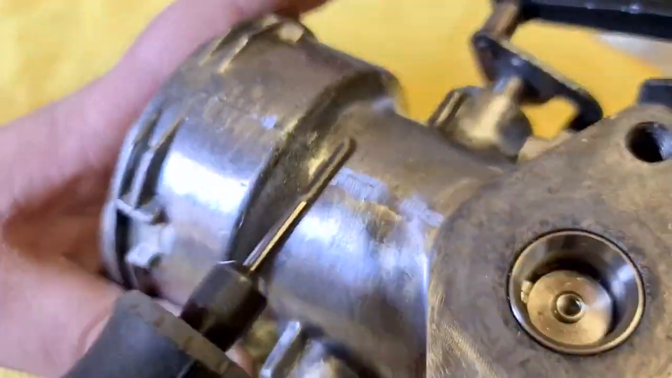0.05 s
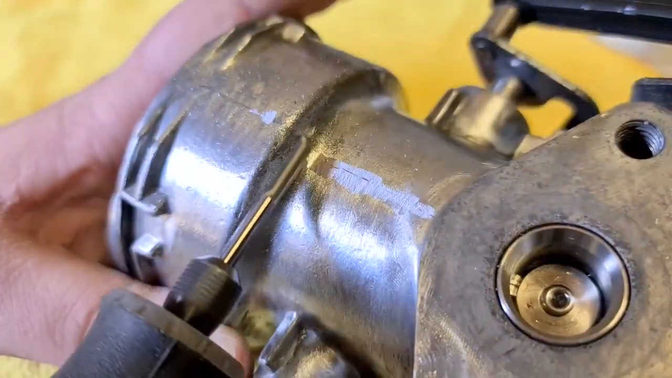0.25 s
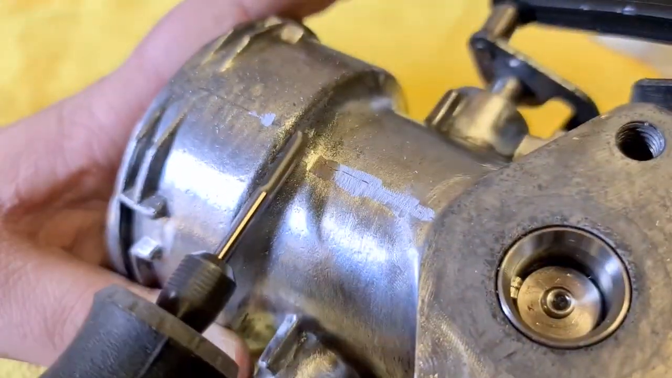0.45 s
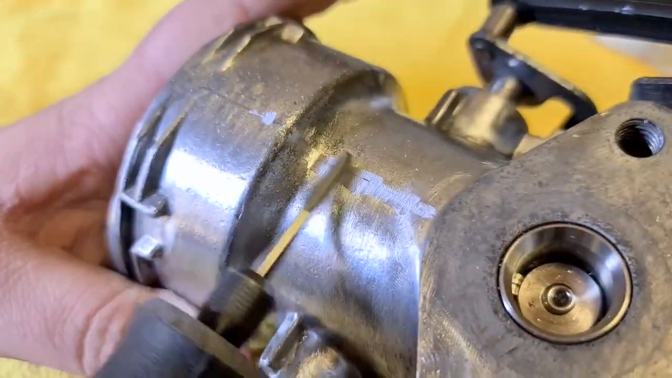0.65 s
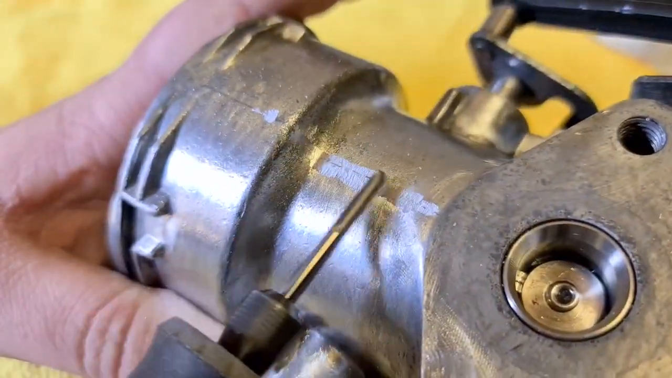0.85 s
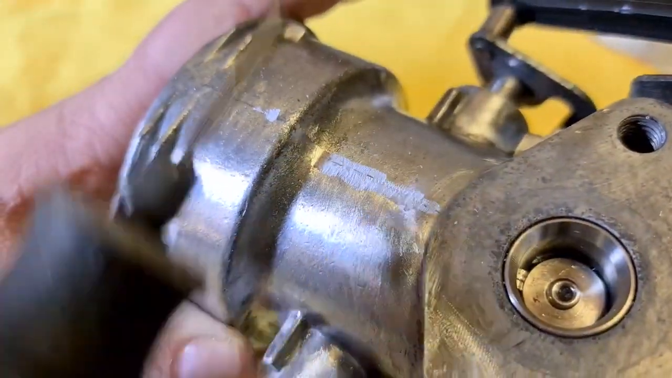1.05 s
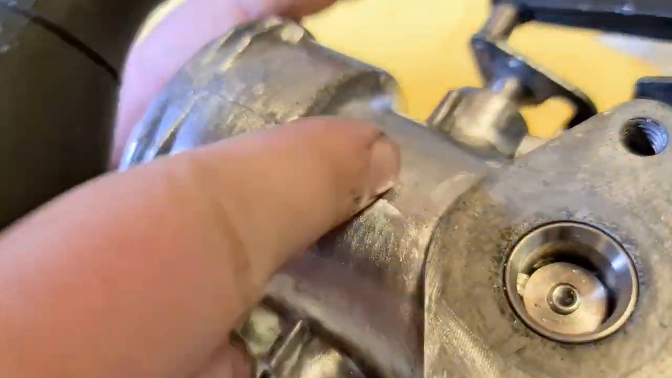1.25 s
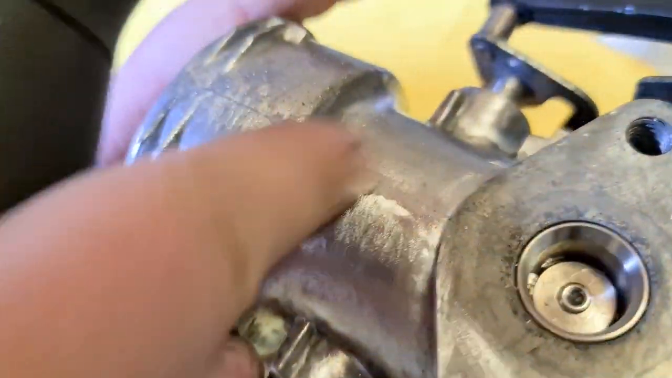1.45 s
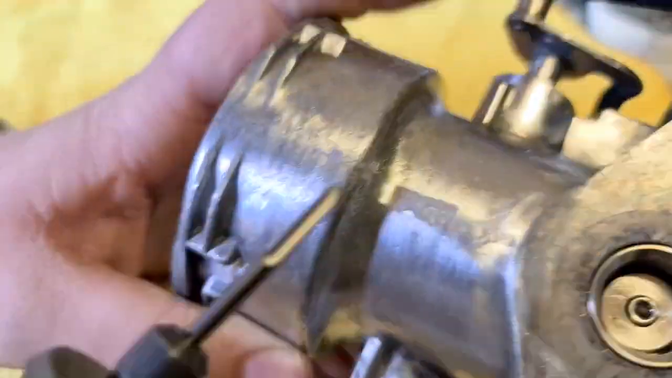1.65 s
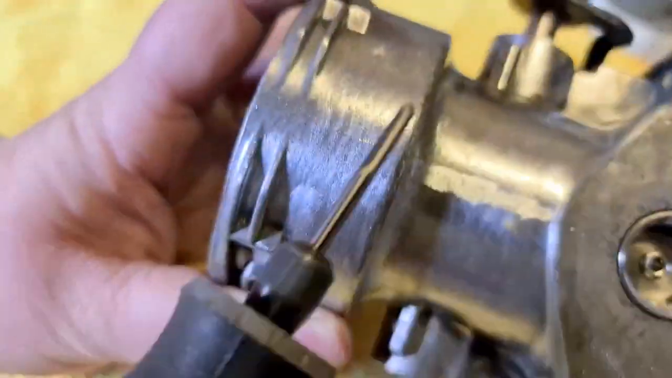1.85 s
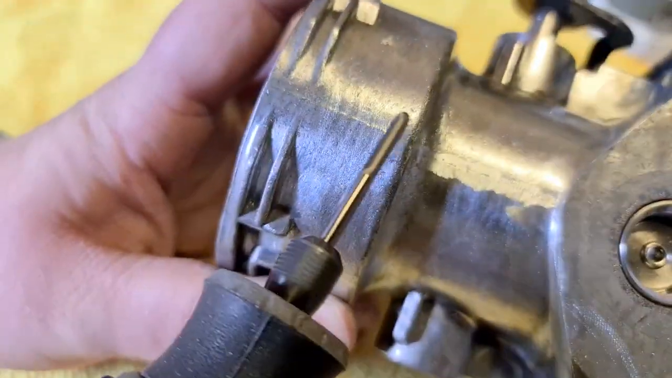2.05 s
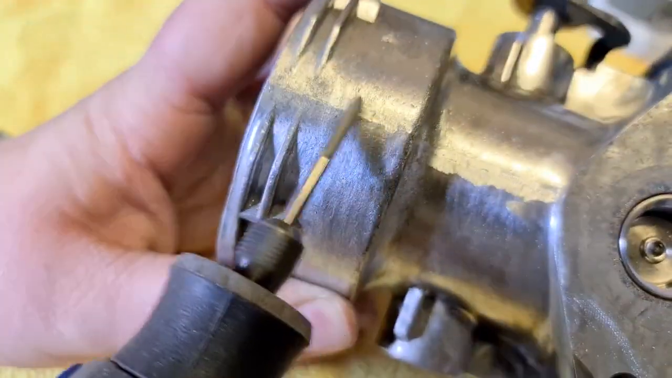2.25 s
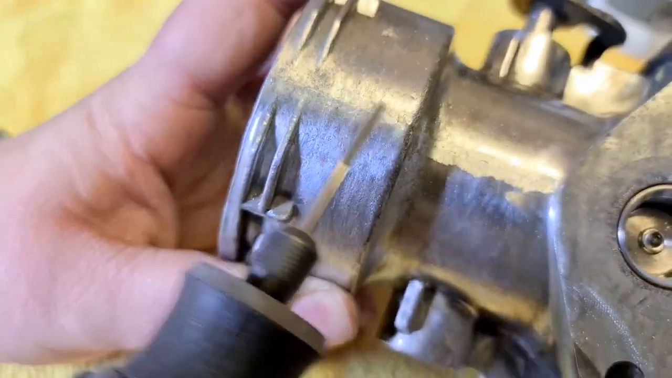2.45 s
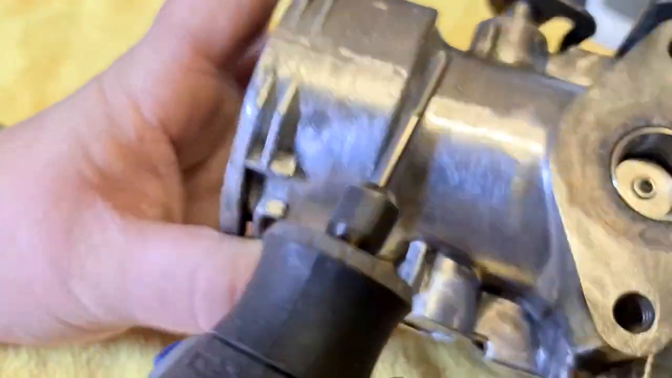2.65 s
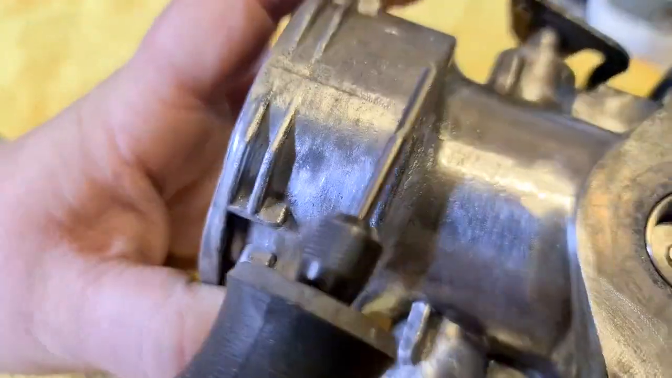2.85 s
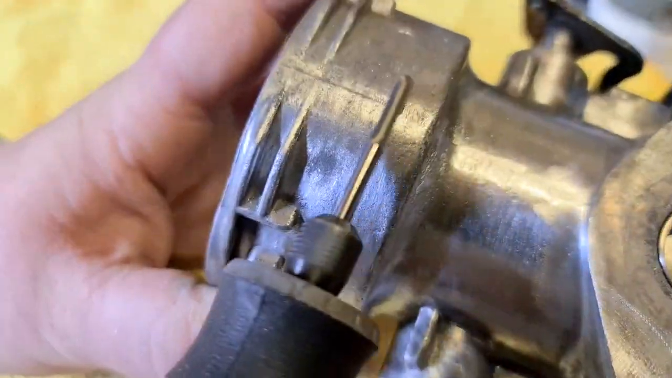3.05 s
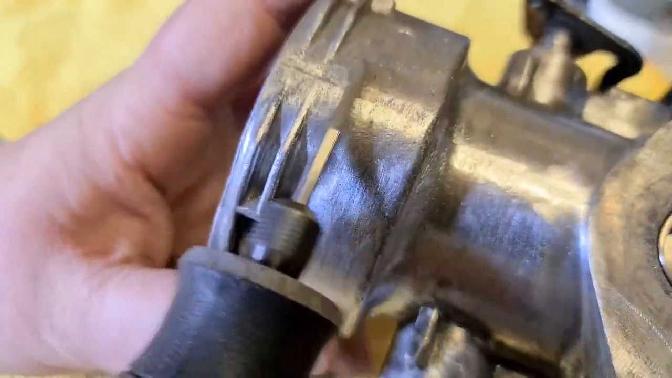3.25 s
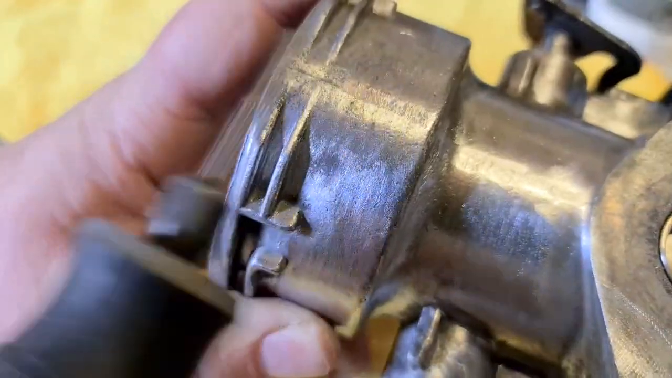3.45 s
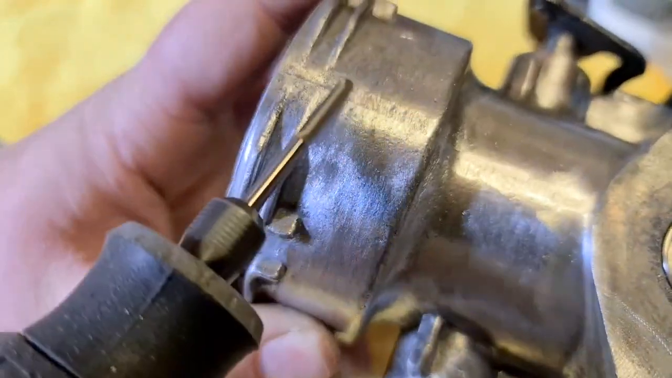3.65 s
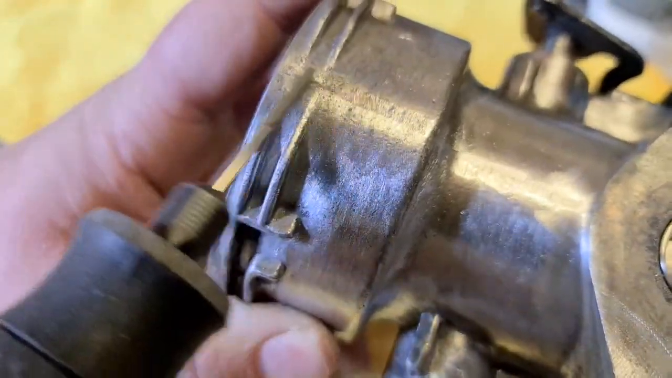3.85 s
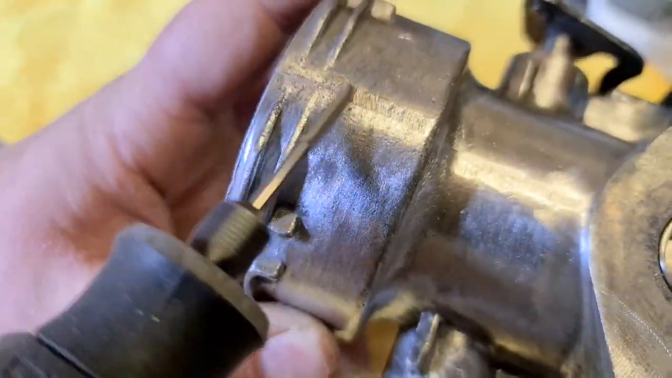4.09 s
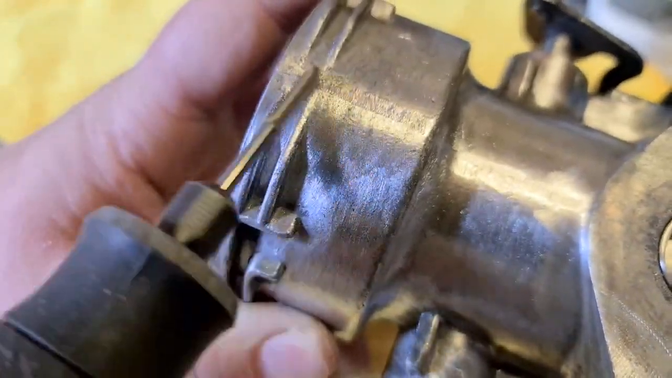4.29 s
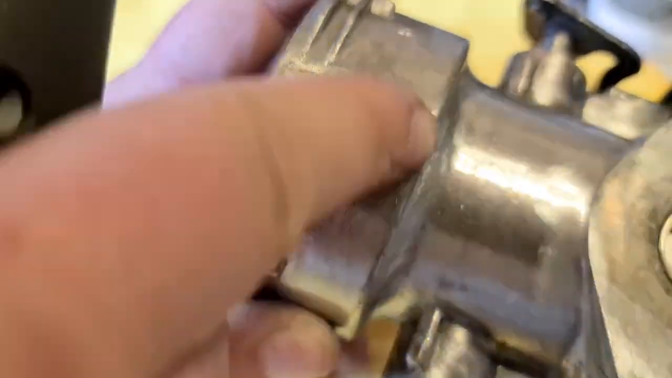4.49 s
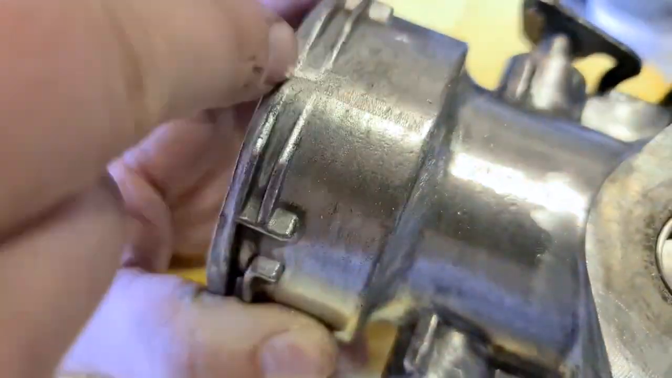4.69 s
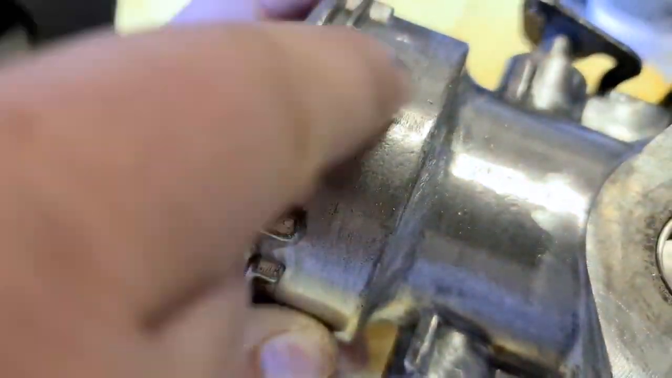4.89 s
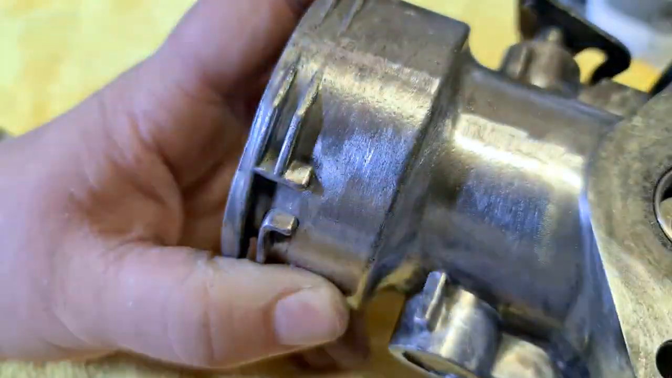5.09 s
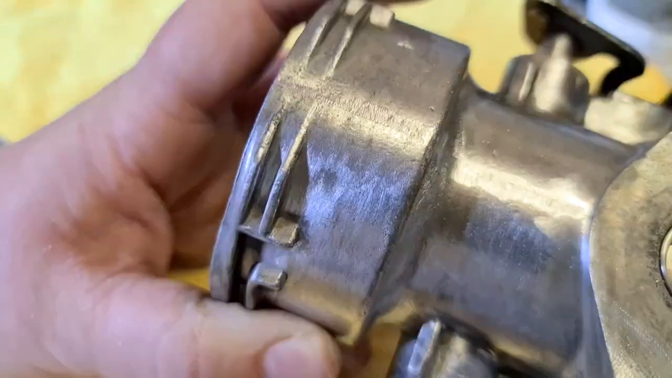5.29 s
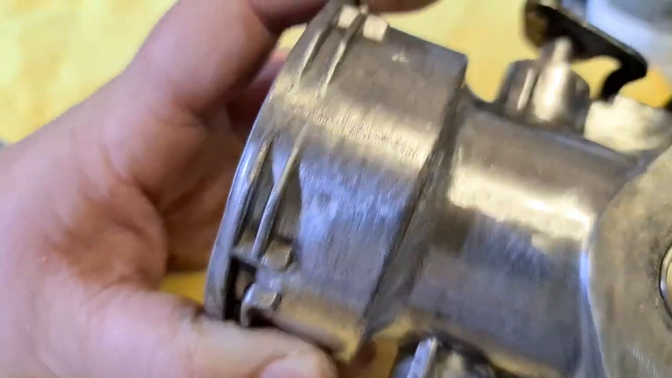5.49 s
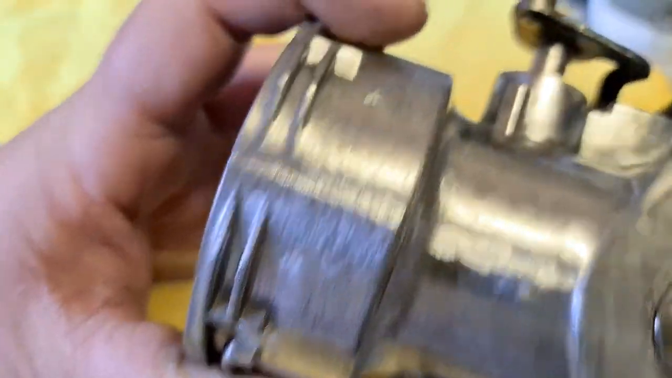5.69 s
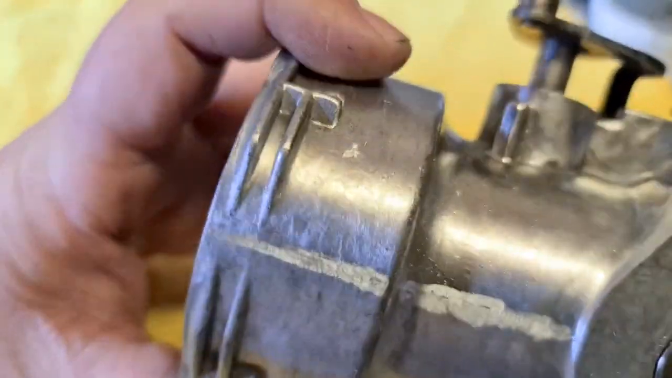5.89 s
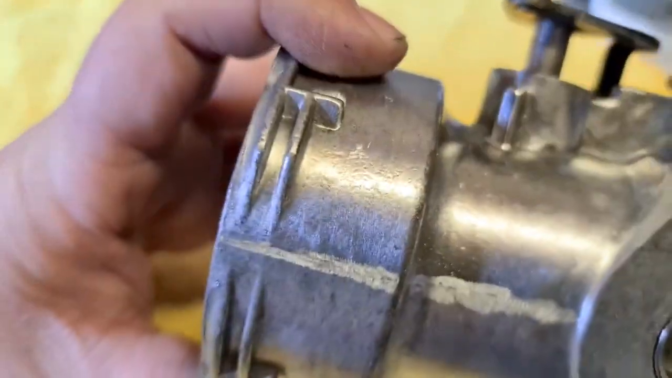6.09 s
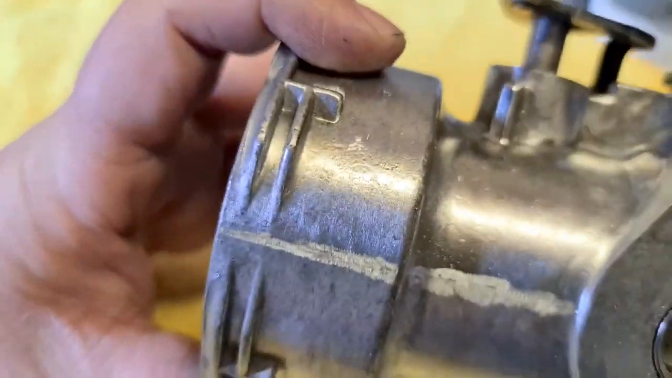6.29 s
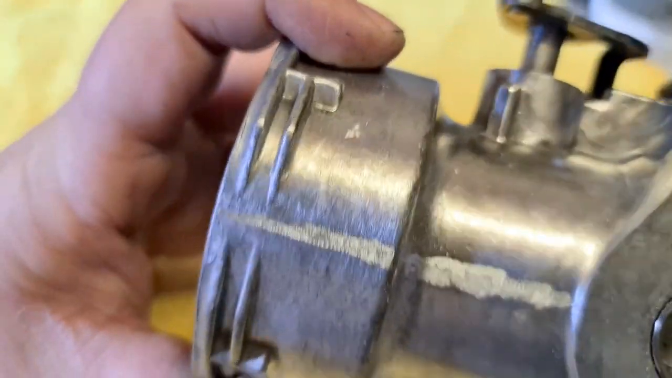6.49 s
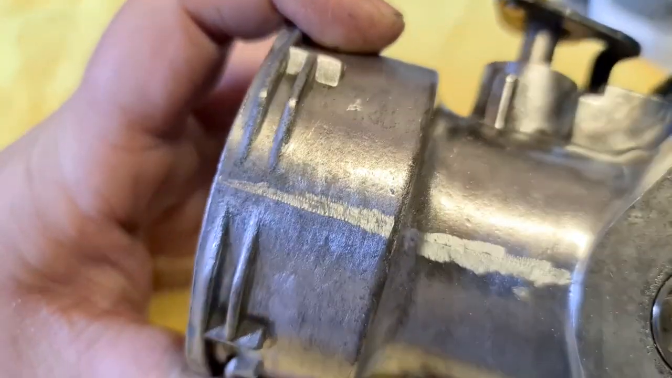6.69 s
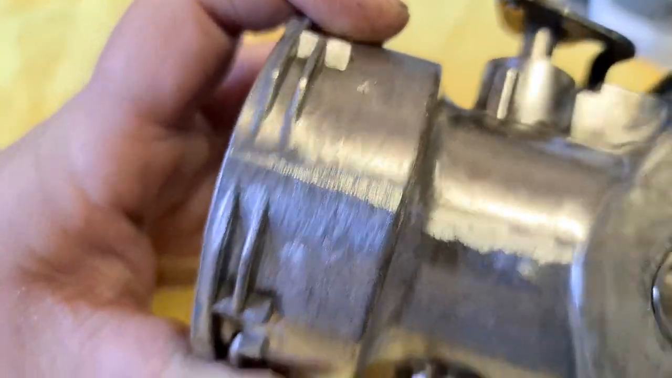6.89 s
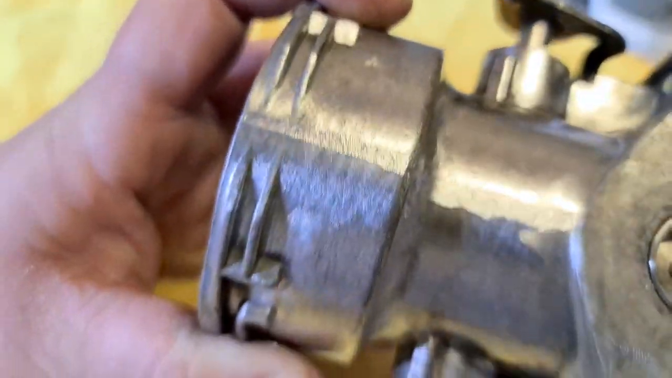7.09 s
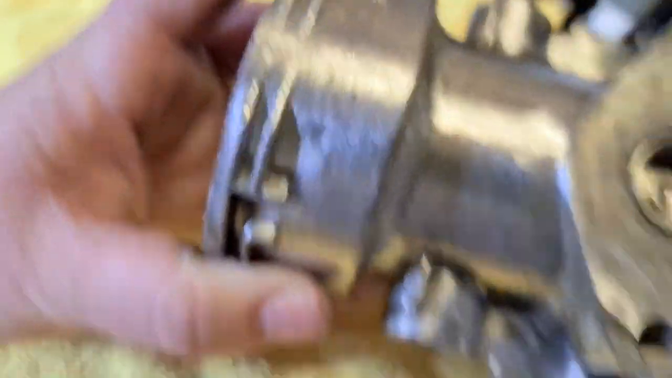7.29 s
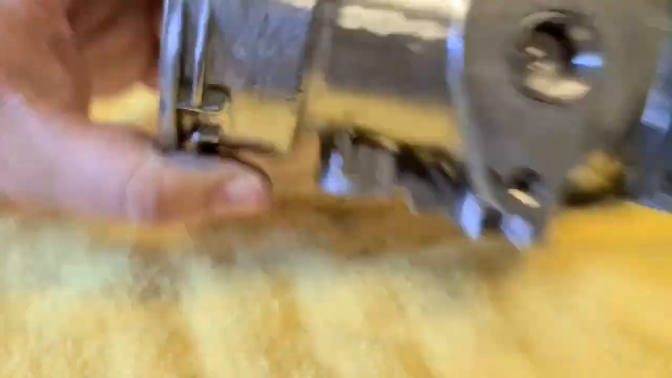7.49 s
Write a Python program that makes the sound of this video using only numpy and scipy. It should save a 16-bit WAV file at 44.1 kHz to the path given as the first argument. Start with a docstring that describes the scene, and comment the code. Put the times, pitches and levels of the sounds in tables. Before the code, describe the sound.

Close up in a small workshop, a handheld rotary tool runs at fast-forward pace, its whine and fan hiss unnaturally high. Its bit squeals on a metal casting in three clusters of tiny stuttering bites, with airy gaps between. The pitch leaps briefly, then time returns to normal and the motor coasts down, whine and rush gliding lower and fading into faint room hum and hiss.

```python
"""Rotary tool on an aluminium casting

A handheld tool smooths a casting close by, at six times its pace, so every tone lies high.
The bit's chatter and grit, the motor's tones and the fan's air follow one shaft speed.
That speed surges once; then time drops to its normal pace and the motor coasts down.
Its tones glide and its filtered noise fades with falling speed, over a low room hum."""
import sys
import numpy as np
from scipy import signal
from scipy.fft import rfft, irfft, next_fast_len
from scipy.io import wavfile

SR = 44100
rng = np.random.default_rng(int(sys.argv[2]) if len(sys.argv) > 2 else 0)


def unload_audio(sound):
    """Save the sound as a 16-bit wav file, at the path given as the first command line argument."""
    columns = np.transpose(np.atleast_2d(sound))
    # keep every value between -1 and 1, then stretch to whole-number steps
    steps = np.round(np.clip(columns, -1, 1) * 32767)
    wavfile.write(sys.argv[1], SR, steps.astype(np.int16))


N = 332514
T = np.arange(N) / SR
BINS = np.fft.rfftfreq(next_fast_len(N), 1 / SR)

NORMAL_PACE_S, FAST_FORWARD = 5.394, 6
RIPPLE_HZ, HUM_HZ = 100, 49.5   # at normal pace
CUTOFF_HZ = 15900
# the switch is pushed past a higher setting: the speed swells in one arc
SURGE_S, SURGE_RISE_S, SURGE_HZ = 5.296, .074, 1120

# Stereo of the working and the coasting tool at two microphone ports. Each holds three lists of rows:
# frequency in Hz, likeness of the ports (below 0 counts as 0); frequency in Hz, left over right in dB;
# frequency in Hz, lead of the left port in radians.
WORK_PORTS = ([(60, -0.08), (130, 0.25), (290, 0.64), (640, 0.34), (1410, 0.17), (3100, 0.19),
              (6820, -0.25), (15000, -0.18)], [(60, 0.0), (110, 2.5), (200, 7.0), (380, 1.5), (700, 5.5),
              (1290, 7.0), (2380, 0.5), (4400, 4.0), (8120, 5.0), (15000, 7.5)], [(0, 0), (780, -0.1),
              (1290, 1.4), (2670, 0.1), (4050, 1.1), (5510, 1.7), (6290, 3.0), (7060, 2.3), (8350, 3.4),
              (9650, 2.8), (10600, 3.6), (10900, 3.3), (15200, 4.6), (16700, 4.1)])
COAST_PORTS = ([(60, 0.99), (130, 0.91), (290, 0.76), (640, 0.15), (1410, -0.33), (3100, -0.13),
               (6820, 0.08), (15000, 0.06)], [(60, 0.0), (110, 0.0), (200, 2.0), (380, 1.5), (700, 0.0),
               (1290, 4.0), (2380, 2.5), (4400, 2.5), (8120, 3.0), (15000, 5.5)], [(0, 0), (1030, 1.8),
               (2070, 2.6), (3010, 4.1), (3450, 5.7), (4570, 6.4), (5430, 6.8), (7060, 15.9), (7580, 21.4),
               (9220, 24.8), (9730, 24.4), (10700, 18.2), (11400, 19.0), (16700, 25.5)])
# Fan hiss under power. Each row: time in seconds, relative level in dB.
HISS = [(0, -38.5), (.15, -44.5), (.5, -39.5), (.95, -44), (1.25, -40.5), (1.58, -40), (1.65, -42.5),
        (1.97, -41.5), (3.35, -39.5), (3.55, -41), (4.78, -42), (4.87, -45), (5.1, -40.5), (5.16, -49.5),
        (5.29, -47.5)]


def grinding(shaft):
    """The bit hits once a turn with uneven force; grit rings the same metal in between."""
    # Chatter heard as growl of the casting and as squeal. Each row: multiple of shaft speed, level in dB.
    growl_orders = [(2, -8.5), (3, -0.35), (4, -15.5), (5, -16)]
    squeal_orders = [(7, -18), (8, -13), (10, -16.5), (11, 3)]
    # Resonances of bit and casting. Each row: frequency in Hz, width in Hz, level in dB.
    grit_modes = [(2730, 76, -16), (4200, 120, -11), (4840, 270, -18), (10360, 1500, -19),
                  (10450, 300, -13), (13920, 620, -9), (15100, 190, 5)]
    # Each pass works another spot, which favours other orders of the growl.
    # Each row: start in seconds, end in seconds, gain of the second order in dB, of the fourth in dB.
    passes = [(.28, .705, 2.5, -2), (.705, 1.12, -1, 0), (2.16, 2.55, -2, -2), (3.0, 3.49, 1.5, 3),
              (3.79, 4.5, .5, -1)]
    # Bounces of the bit. Each row: start in seconds, end in seconds, relative level in dB.
    bounces = [(.833, 0.844, -34.5), (2.45, 2.461, -39)]
    attack_s, release_s = .001, .0028

    force_db = 1.4 * (drift(70) + np.array([drift(110), drift(110)]) / 2)
    squeal, growl = bites(attack_s, release_s) * from_db(force_db)
    hit = shaft + 0.065 * drift(58)   # the point of contact wanders round the bit
    second_db, fourth_db = sum(np.outer(gains_db, gate(T, start, end, attack_s, release_s))
                               for start, end, *gains_db in passes)
    spot_db = {2: second_db, 4: fourth_db}
    growl_tones = sum(from_db(db + spot_db.get(order, 0)) * wavering(order * hit, rough=0.26, rate=67)
                      for order, db in growl_orders)
    squeal_tones = sum(from_db(db) * wavering(order * hit, rough=0.2, rate=100)
                       for order, db in squeal_orders)
    bounce = sum(from_db(db) * gate(T, start, end, attack_s, release_s) for start, end, db in bounces)
    bounce_tone = bounce * wavering(3.5 * hit, rough=0.45, rate=85)
    tones = growl * growl_tones + squeal * squeal_tones + bounce_tone
    grit = rms_one(to_wave(noise(WORK_PORTS, resonances(grit_modes))))
    grit = grit * (1 + 0.11 * np.cos(hit))   # pulses once a turn
    return from_db(0.5) * to_wave(at_ports(WORK_PORTS, to_bins(tones))) + from_db(1.5) * squeal * grit


def bites(attack_s, release_s):
    """Squeal and growl strength: each touch sets in fast, swells and lets go, skimming on either side."""
    # The bit bites the metal. Each row: start in seconds, end in seconds,
    # relative level of the squeal in dB, of the casting's growl in dB.
    touches = [(0.309, 0.349, -34.0, -35.0), (0.351, 0.392, -32.5, -36.0), (0.393, 0.431, -32.5, -38.0),
               (0.432, 0.465, -39.0, -40.5), (0.481, 0.492, -36.5, -36.0), (0.489, 0.521, -41.0, -47.0),
               (0.524, 0.551, -35.0, -42.0), (0.555, 0.584, -39.5, -42.0), (0.581, 0.608, -41.0, -41.5),
               (0.606, 0.618, -37.0, -50.0), (0.617, 0.646, -39.5, -46.5), (0.66, 0.687, -35.5, -40.5),
               (0.682, 0.694, -33.5, -36.5), (0.718, 0.772, -35.0, -32.5), (0.757, 0.768, -25, -35),
               (0.783, 0.807, -37.0, -42.0), (0.821, 0.84, -25.5, -33.0), (0.839, 0.849, -27.0, -30.0),
               (1.009, 1.02, -42, -39), (1.02, 1.081, -34.5, -30.0), (1.073, 1.081, -25.5, -31),
               (2.186, 2.203, -24.0, -30.0), (2.229, 2.257, -26.5, -31.0), (2.259, 2.278, -29.0, -33.5),
               (2.271, 2.325, -28.5, -31.0), (2.326, 2.345, -22.5, -30.0), (2.352, 2.377, -29.5, -33.5),
               (2.39, 2.403, -30.5, -32.5), (2.403, 2.414, -30.5, -36.0), (2.448, 2.462, -22.5, -29.0),
               (2.509, 2.521, -25.0, -30.5), (3.033, 3.046, -32.0, -30.5), (3.047, 3.056, -35.5, -34.5),
               (3.074, 3.091, -34.0, -30.0), (3.086, 3.119, -35.5, -36.0), (3.12, 3.16, -31.0, -36.0),
               (3.155, 3.169, -26.5, -38.0), (3.169, 3.208, -26.5, -32.5), (3.211, 3.246, -32.0, -33.0),
               (3.259, 3.284, -30.5, -33.5), (3.301, 3.313, -31.5, -30.0), (3.313, 3.321, -28.5, -36.5),
               (3.341, 3.366, -33.0, -33.5), (3.364, 3.41, -33.0, -33.0), (3.411, 3.446, -35.5, -36.0),
               (3.441, 3.464, -35.0, -36.0), (3.819, 3.825, -29.5, -38.5), (3.83, 3.848, -26.5, -33.0),
               (3.853, 3.897, -31.5, -37.0), (3.894, 3.903, -29.0, -32.5), (3.904, 3.963, -32.0, -36.0),
               (3.967, 4.007, -29.0, -32.5), (4.022, 4.033, -33.5, -38.5), (4.033, 4.042, -32.0, -40.5),
               (4.057, 4.065, -32.0, -39.5), (4.073, 4.105, -29.5, -35.5), (4.1, 4.12, -27.0, -33.0),
               (4.123, 4.13, -31.5, -38.0), (4.127, 4.133, -46.5, -42.5), (4.137, 4.145, -33.5, -43.5),
               (4.147, 4.159, -27.0, -32.0), (4.154, 4.19, -27.5, -33.5), (4.191, 4.217, -29.0, -35.5),
               (4.217, 4.23, -29.5, -33.0), (4.234, 4.244, -30.5, -37.5), (4.245, 4.258, -26.5, -32.5),
               (4.252, 4.283, -27.0, -32.5), (4.283, 4.293, -32.5, -30.5), (4.307, 4.329, -27.5, -35.0),
               (4.355, 4.395, -27.0, -34.0), (4.402, 4.411, -27.0, -34.0), (4.416, 4.427, -28.5, -35.0),
               (4.433, 4.439, -37.0, -38.0), (4.462, 4.47, -26.0, -33.0)]
    # Skimming against the full touch: squeal in dB, growl in dB.
    skim_db = [-22, -15]
    arch_db, skim_s = 4, .012

    out = np.zeros((2, N))
    for start, end, *levels_db in touches:
        near = slice(int((start - .04) * SR), int((end + .04) * SR))
        off_middle = np.minimum(((2 * T[near] - start - end) / (end - start)) ** 2, 2)
        contact = gate(T[near], start, end, attack_s, release_s) * from_db(-arch_db * off_middle)
        skim = from_db(skim_db)[:, None] * gate(T[near], start, end, skim_s, skim_s)
        touch = from_db(levels_db)[:, None] * (contact + skim)
        out[:, near] = np.maximum(out[:, near], touch)   # the stronger of overlapping touches
    return out


def motor(speed, shaft):
    """Unbalance gives the shaft tone; mains ripple splits the whine of eight fan blades into sidebands."""
    # Shaft tone as the hand moves the tool. Each row: time in seconds, relative level in dB.
    tone_level = [(0, -57), (1.15, -54.5), (1.62, -53), (1.87, -47.5), (2.46, -50), (2.98, -47.5),
                  (3.2, -51), (3.68, -46), (4.45, -47), (4.8, -48), (4.88, -54), (5.12, -51.5), (5.16, -68),
                  (5.29, -60.5)]
    # The hold on the tool sets where its whine is loudest. Each row: time in seconds, centre in Hz.
    whine_centre = [(0, 13300), (1.6, 13500), (2.2, 12400), (3.7, 12600), (4.6, 12200), (5.05, 11500),
                    (5.29, 12000), (5.33, 14000)]
    # Sidebands of the whine. Each row: multiple of the ripple added, level in dB.
    whine_sidebands = [(-2, -17), (-1, -13), (0, -8), (1, -7), (2, -7), (3, -9), (4, -6), (5, -8), (6, -12),
                       (7, -15)]
    # Ripple heard directly while the tool lies against the casting.
    # Each row: start in seconds, end in seconds, level in dB.
    buzzes = [(2.107, 2.55, -64), (4.52, 4.8, -68)]

    facing_db, third_db, _ = swings()
    centre_hz = in_time(whine_centre)
    tone_db = in_time(tone_level) + 0.91 * facing_db
    ripple_hz = RIPPLE_HZ * FAST_FORWARD
    ripple = 2 * np.pi * ripple_hz * T

    whine = 0
    for k, db in whine_sidebands:
        phase = 8 * shaft + k * ripple + np.pi * k * k / 4
        gain = from_db(db) * whine_gain(8 * speed + k * ripple_hz, centre_hz)
        whine = whine + gain * wavering(phase, rough=.25, rate=25)
    surge_whine_db = 13 * np.minimum(1, 4 * surge())
    whine = from_db(in_time(HISS) - .5 + facing_db + surge_whine_db) * whine

    surge_tone = (T > SURGE_S) * from_db(-32.5 - 39 * (1 - surge()))
    unbalance = (from_db(tone_db + 1.0) + surge_tone) * wavering(shaft, rough=0.16, rate=87)
    third_order = from_db(tone_db - 7 + third_db) * wavering(3 * shaft, rough=.12, rate=20)
    buzz = from_db(-77.5) + sum(from_db(db) * gate(T, start, end, .0019, .0019)
                                for start, end, db in buzzes)
    tones = unbalance + third_order + buzz * wavering(ripple, rough=0.28, rate=9.7)
    return to_wave(at_ports(WORK_PORTS, to_bins(tones + whine)))


def whine_gain(hz, centre_hz):
    """Gain of a whine partial at hz: it falls off either side of the centre."""
    width_hz = 5200
    return 1 / (1 + (2 * (hz - centre_hz) / width_hz) ** 2)


def swings():
    """Gains in dB while the tool is swung aside and its vents face the microphone."""
    # Each row: start in seconds, end in seconds, gain in dB of the whine (shaft tone and sizzle take a
    # little less), further gain of the third order in dB, gain of the top of the sizzle in dB.
    swing_rows = [(-.1, 0.153, 6.5, 4, 10), (1.215, 1.593, 9, 6.5, 12.5), (1.678, 1.728, 3, -5, 12),
                  (4.47, 4.843, 2, -3, 2), (4.978, 5.114, 8.5, -0.5, 0)]
    return sum(np.outer(gains_db, gate(T, start, end, .0019, .0019)) for start, end, *gains_db in swing_rows)


def cooling_air():
    """Filtered noise: fan rush and hiss, brush sizzle, rumble of draught on casting, scuffs of the hand."""
    # Colours of the fan's air and of the draught's rumble. Each row: frequency in Hz, density in dB per Hz.
    air_colour = [(500, -17), (750, -23), (1100, -22), (1600, -18.5), (2200, -13), (3000, -8), (4300, -2.5),
                  (6200, -6), (7200, -5.5), (9000, -9.5), (10800, -2.5), (13500, -4), (15000, -4),
                  (16000, -12)]
    rumble_colour = [(30, -58), (100, -29.5), (170, -9.5), (260, -2.5), (380, -1), (520, -8.5), (800, -40),
                     (1500, -78)]
    # Rumble of the draught and rush of the fan. Each row: time in seconds, relative level in dB.
    rumble_level = [(0, -50.5), (1.15, -51), (1.3, -46), (1.9, -48.5), (1.97, -58), (2.5, -62.5),
                    (2.95, -55.5), (3.4, -63), (3.57, -58), (4.0, -62), (4.72, -61), (4.82, -52.5),
                    (4.96, -56), (5.08, -63), (5.13, -60), (5.18, -73), (5.29, -76)]
    rush_level = [(0, -54), (1.0, -57.5), (1.25, -57.5), (1.9, -59.5), (2.0, -63.5), (2.5, -63.5),
                  (2.95, -59.5), (3.4, -60.5), (3.57, -58.5), (4.0, -61.5), (4.76, -62.5), (4.85, -61),
                  (5.1, -61), (5.18, -71), (5.29, -75)]
    # Sizzle of the brushes. Each row: time in seconds, level above the hiss table in dB.
    sizzle_level = [(0, -13), (.6, -18), (.9, -14), (1.15, -7), (1.3, -15), (1.6, -13), (1.8, -4.5),
                    (2.15, -5), (2.6, -9.5), (3.5, -6.5), (4.5, -6), (5.29, -9.5)]
    # Short scuffs of the hand on the casting. Each row: time in seconds, length in seconds, level in dB.
    scuff_rows = [(0.554, 0.014, -49.5), (1.408, 0.0081, -53), (3.137, 0.27, -62.5), (3.555, 0.015, -50),
                  (3.66, 0.072, -64), (4.58, 0.016, -58)]

    surge_db = 7.5 * surge()
    rumble_db = in_time(rumble_level) + surge_db
    hiss_db = in_time(HISS) + surge_db
    rush_db = in_time(rush_level) + surge_db
    sizzle_db = hiss_db + in_time(sizzle_level)
    facing_db, _, top_db = swings()

    air = noise(WORK_PORTS, from_db(at_hz(air_colour, BINS)))
    draught = noise(WORK_PORTS, from_db(at_hz(rumble_colour, BINS)))
    rumble = band(draught, 20, 1500, gauge=(330, 560))
    rush = band(air, 550, 1400, gauge=(600, 1200))
    hiss = band(air, 1700, 9800, gauge=(5000, 9000))
    sizzle = band(air, 10200, 20000, gauge=(11400, 13300))
    murmur = band(noise(WORK_PORTS, 1), 35, 220, gauge=(40, 200))

    # the top of the sizzle takes its own gain as the vents turn
    top = to_wave(to_bins(sizzle) / (1 + (12600 / (BINS + 100)) ** 30))
    sizzle = from_db(0.93 * facing_db) * (sizzle - top) + from_db(top_db) * top

    bump = puff(5.13, length_s=.01, db=-47)   # soft, as the tool is taken away
    scuffs = sum(puff(*row) for row in scuff_rows)
    low = (from_db(rumble_db - 1.57 + 2.0 * drift(13.0)) + bump) * rumble + from_db(-74.5) * murmur
    middle = (from_db(rush_db + 2.06 * drift(28)) + scuffs) * rush
    high = from_db(hiss_db - 2.5 + 1.55 * drift(25)) * hiss
    sparking_db = 1.5 * drift(40)
    return low + middle + high + from_db(sizzle_db + sparking_db) * sizzle


def surge():
    """The swell of speed before the switch-off: 0 before it, 1 at its top, in a sine arc."""
    return np.sin(np.pi / 2 * np.clip((T - SURGE_S) / SURGE_RISE_S, 0, 2))


def coasting_speed():
    """Turns per second: bearing friction brakes evenly, air drag grows with speed squared."""
    friction_hz_per_s, standstill_s = 150.26, 7.6824
    drag_hz = 517   # speed at which drag equals friction
    left_s = standstill_s - np.maximum(T, NORMAL_PACE_S)
    return drag_hz * np.tan(friction_hz_per_s / drag_hz * left_s)


def fading(speed, level_db, exponent):
    """Gain that falls from switch-off with a power of the speed and dies as the rotor nears a stall."""
    stall_hz = 57
    return from_db(level_db) * (speed / speed[0]) ** exponent / np.hypot(1, (stall_hz / speed) ** 4)


def coasting_tones(speed, shaft):
    """Without power the tones of shaft, 18 commutator bars and 8 fan blades glide down together."""
    # Overtones of the eight fan blades. Each row: multiple of the shaft speed, level in dB.
    fan_orders = [(24, 2), (32, 2), (40, -3), (48, 1), (56, -1), (64, -2), (72, 0), (80, -4), (88, -3),
                  (96, -5)]
    # Resonances the tones glide through: of the tool's housing (fan overtones and brush noise), of the
    # motor frame (bars) and of the fan's rings (second blade overtone).
    # Each row: frequency in Hz, width in Hz, level in dB.
    housing_modes = [(3550, 600, 0), (4700, 600, -6), (5750, 600, -8), (8600, 500, -6), (10550, 600, .5),
                     (11300, 400, -4), (13000, 3000, -12)]
    frame_modes = [(1200, 380, 2), (1950, 700, -3), (2600, 350, -13), (3900, 400, -3), (5200, 1500, -7),
                   (7000, 3200, 3)]
    fan_rings = [(3550, 600, 2.5), (5050, 400, -6)]

    fan = 0
    for order, db in fan_orders:
        audible = order * speed < CUTOFF_HZ
        fan = fan + audible * from_db(db + drift(8)) * wavering(order * shaft, rough=.3, rate=30)
    fan = fan * (1 + .6 * np.cos(shaft))   # the fan runs slightly out of true
    # the brushes rub over the same rough track on every turn
    track = np.interp(shaft / (2 * np.pi) * 192 % 192, np.arange(192), rng.standard_normal(192))
    bars = fading(speed, level_db=-42, exponent=.85) * wavering(18 * shaft, rough=.4, rate=25)
    blades = fading(speed, level_db=-42, exponent=1.3) * wavering(16 * shaft, rough=.3, rate=20)
    unbalance = fading(speed, level_db=-38, exponent=4.7) * wavering(shaft, rough=.2, rate=18)
    whir = fading(speed, level_db=-47, exponent=1.45) * (fan + from_db(8) * track)
    whir = to_bins(whir) * resonances(housing_modes)
    whine = to_bins(bars) * resonances(frame_modes) + to_bins(blades) * resonances(fan_rings)
    # the small frame radiates little below 900 Hz
    whine = whine / (1 + (900 / (BINS + 1)) ** 8)
    return to_wave(at_ports(COAST_PORTS, to_bins(unbalance) + whine + whir))


def coasting_air(speed, shaft):
    """Noise bands fade with speed into a faint hiss; the hollow vent note lingers, the hand slides."""
    # Colour of the coasting air. Each row: frequency in Hz, density in dB per Hz.
    coast_colour = [(88, -72), (150, -42), (193, -34), (321, -13.5), (368, -12), (431, -11.5), (1140, -0.5),
                    (2360, -7.5), (3620, -1), (5360, -4.5), (6020, -8.5), (7100, -11.5), (7700, -10.5),
                    (8560, -4.5), (10600, -6), (16000, -16)]
    # Colour of the hand sliding on the casting. Each row: frequency in Hz, width in Hz, level in dB.
    slide_modes = [(3400, 1500, 0), (9500, 3000, -5)]

    air = noise(COAST_PORTS, from_db(at_hz(coast_colour, BINS)))
    low = band(air, 150, 2300, gauge=(600, 2400))
    middle = band(air, 2400, 7700, gauge=(2400, 8000))
    high = band(air, 7700, 20000, gauge=(8000, 15000))
    rush = fading(speed, level_db=-37.5, exponent=1.79) * from_db(0.93 * drift(32)) * low
    rush = rush + fading(speed, level_db=-44.5, exponent=2.43) * middle
    rush = rush + fading(speed, level_db=-39, exponent=2.29) * high
    rush = rush * (1 + .086 * np.cos(shaft))   # throbs once a turn
    vent = rms_one(to_wave(noise(COAST_PORTS, resonances([(1144, 130, 0)]))))
    vent = fading(speed, level_db=-43, exponent=0.99) * vent
    # the hand slides over the casting as the tool is lifted
    slide = rms_one(to_wave(noise(COAST_PORTS, resonances(slide_modes))))
    slide = puff(7.3, length_s=.15, db=-62) * from_db(1.3 * drift(17)) * slide
    return rush + vent + slide + from_db(-71.5) * rms_one(to_wave(air))


def room():
    """A low hum with two overtones and a faint noise murmur of air in the workshop."""
    # Colour of the room's air. Each row: frequency in Hz, density in dB per Hz.
    room_colour = [(41, -36), (70, -8), (113, -18.5), (151, -24.5), (176, -32), (208, -13), (233, -20),
                   (536, -25), (1000, -53), (1300, -86), (2200, -120)]
    air = band(noise(COAST_PORTS, from_db(at_hz(room_colour, BINS))), 20, 900, gauge=(90, 700))
    phase = 2 * np.pi * HUM_HZ * T
    hum = from_db(-47.5) * wavering(phase, rough=0.022, rate=3.3)
    hum = hum + from_db(-75.5) * wavering(4 * phase, rough=0.56, rate=2.4)
    hum = hum + from_db(-75) * wavering(11 * phase, rough=.3, rate=4)
    return hum + from_db(-67.5) * air


def fast_hum():
    """The room's hum at the fast pace, a single wavering partial slightly louder on the left."""
    hum = wavering(2 * np.pi * HUM_HZ * FAST_FORWARD * T, rough=0.1, rate=30)
    left_right_db = [[-48], [-50]]
    return from_db(left_right_db) * hum


def from_db(db):
    """Decibels to gain."""
    return 10 ** (np.asarray(db) / 20)


def rms_one(x):
    """Scale to unit rms."""
    return x / np.sqrt(np.mean(x ** 2) + 1e-20)


def in_time(rows):
    """Curve over time from rows of (seconds, value)."""
    return np.interp(T, *np.transpose(rows))


def at_hz(points, hz):
    """Read a table on a log-frequency axis."""
    f, value = np.transpose(points)
    return np.interp(np.log(hz + 1), np.log(np.abs(f) + 1), value)


def to_bins(x):
    """Spectrum of a signal."""
    return rfft(x, next_fast_len(N))


def to_wave(spectrum):
    """Signal of a spectrum."""
    return irfft(spectrum, next_fast_len(N))[..., :N]


def drift(rate):
    """Smooth chance: noise through two poles at `rate` Hz, made at an eighth of the rate; spread about 1."""
    r = np.exp(-16 * np.pi * rate / SR)
    slow = signal.lfilter([1], [1, -2 * r, r * r], rng.standard_normal(N // 8 + 4002))[4000:]
    return np.interp(np.arange(N) / 8, np.arange(len(slow)), rms_one(slow))


def angle(hz):
    """Phase of something that turns at hz."""
    return 2 * np.pi * np.cumsum(hz) / SR


def wavering(phase, rough, rate):
    """A partial of about unit rms whose strength and phase flutter."""
    in_phase = (1 + rough * drift(rate)) * np.sin(phase)
    across = rough * drift(rate) * np.cos(phase)
    return np.sqrt(2 / (1 + 2 * rough ** 2)) * (in_phase + across)


def gate(t, start, end, attack_s, release_s):
    """Attack, hold and release between two times."""
    return (1 + np.tanh((t - start) / attack_s)) / 2 * (1 + np.tanh((end - t) / release_s)) / 2


def puff(s, length_s, db):
    """A short, smooth swell."""
    return from_db(db) * np.exp(-((T - s) / length_s) ** 2)


def resonances(modes):
    """Gain per bin of a set of (Hz, width Hz, dB) resonances."""
    return sum(from_db(db) / (1 + (2 * (BINS - hz) / width) ** 2) for hz, width, db in modes)


def at_ports(ports, direct, diffuse=None):
    """Left and right spectra: direct sound differs in level and phase, diffuse sound also in polarity."""
    likeness, balance, lead = ports
    alike = 1. if diffuse is None else np.clip(at_hz(likeness, BINS), 0, 1) ** .5
    tilt = from_db(at_hz(balance, BINS) / 2)
    phase = np.interp(BINS, *np.transpose(lead))
    common = np.sqrt(1 + alike) * direct
    apart = 0 if diffuse is None else np.sqrt(1 - alike) * diffuse
    # evens out the level of the mono sum; the 0.22 keeps cancelled bins from blowing up
    middle = np.sqrt((tilt ** 2 + tilt ** -2 + 2 * alike * np.cos(phase)) / 2 + 0.22)
    left = (common + apart) * tilt
    right = (common - apart) / tilt * np.exp(-1j * phase)
    return np.array([left, right]) / middle


def noise(ports, colour):
    """Spectra of stereo noise with the given gain per bin."""
    return at_ports(ports, *to_bins(rng.standard_normal((2, N)))) * colour


def band(spectra, low_hz, high_hz, gauge):
    """One band of a noise, scaled so its mono mix has unit rms within the gauge band (Hz, Hz)."""
    edges = 1 / np.sqrt((1 + (low_hz / (BINS + 1)) ** 8) * (1 + (BINS / high_hz) ** 8))
    inside = (spectra.mean(axis=0) * edges)[(BINS > gauge[0]) & (BINS < gauge[1])]
    return to_wave(spectra * edges) * N / np.sqrt(2 * np.sum(np.abs(inside) ** 2))


def scene():
    """The fast-running work, then the spin-down at normal pace."""
    # Shaft speed under power, as heard, before the surge. Each row: time in seconds, turns per second.
    work_speed = [(0.0, 1434.8), (0.3, 1434.6), (0.53, 1414.7), (0.8, 1413.7), (0.95, 1428.9),
                  (1.1, 1429.6), (1.35, 1453.9), (1.65, 1445.2), (2.14, 1418.7), (2.44, 1376.0),
                  (2.75, 1395.1), (3.04, 1400.0), (3.22, 1371.7), (3.45, 1357.7), (3.68, 1376.0),
                  (4.32, 1373.3), (4.57, 1399.0), (4.8, 1398.0), (5.0, 1389.8), (5.12, 1390.0),
                  (5.29, 1394.0)]
    speed = in_time(work_speed) + SURGE_HZ * surge()
    shaft = angle(speed * (1 + 0.000616 * drift(19.5)))
    work = grinding(shaft) + motor(speed, shaft) + cooling_air() + fast_hum()

    slowing = coasting_speed()
    rotor = angle(slowing * (1 + .002 * drift(25)))
    coast = coasting_tones(slowing, rotor) + coasting_air(slowing, rotor) + room()
    normal = np.clip((T - NORMAL_PACE_S) / .004 + .5, 0, 1)   # crossfade within 4 ms
    return (1 - normal) * work + normal * coast


def record(dry):
    """The top is cut steeply."""
    return signal.sosfilt(signal.ellip(12, .1, 80, CUTOFF_HZ, fs=SR, output="sos"), dry)


dry = scene()
out = record(dry)
unload_audio(out)
```